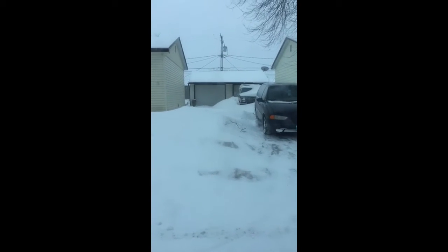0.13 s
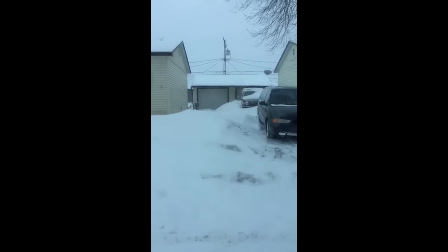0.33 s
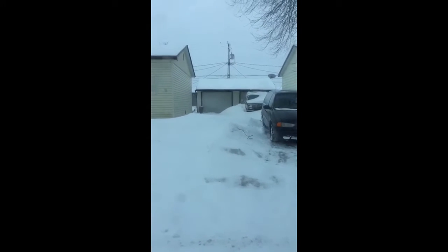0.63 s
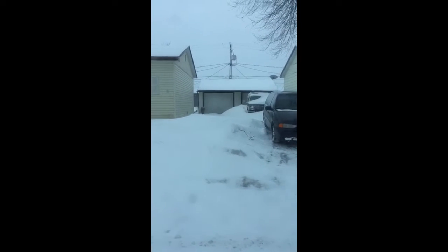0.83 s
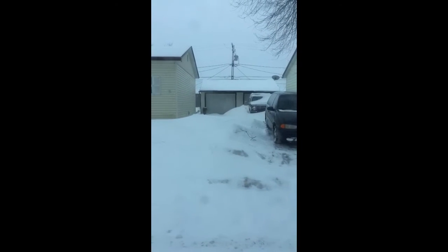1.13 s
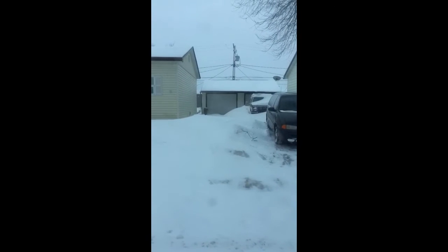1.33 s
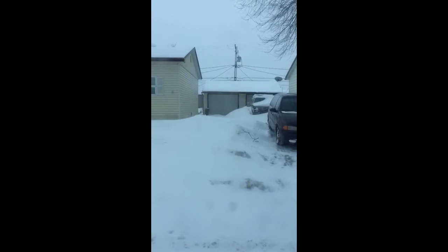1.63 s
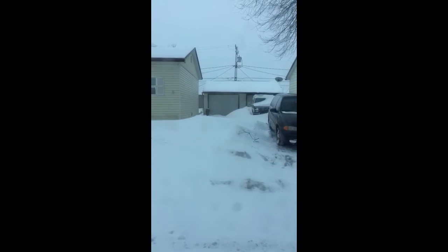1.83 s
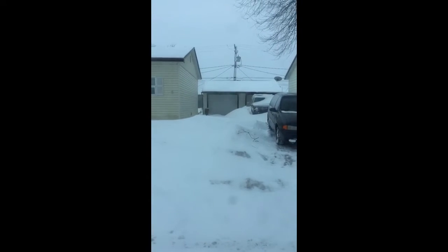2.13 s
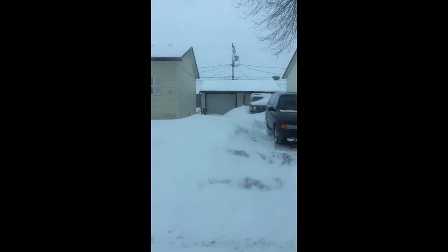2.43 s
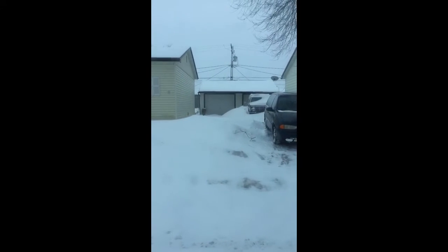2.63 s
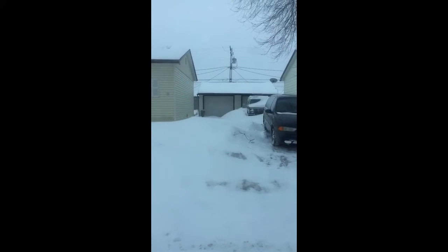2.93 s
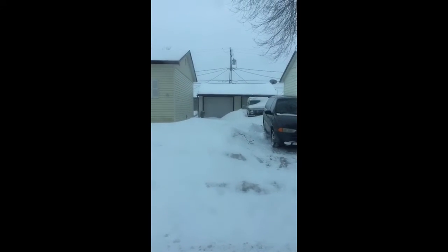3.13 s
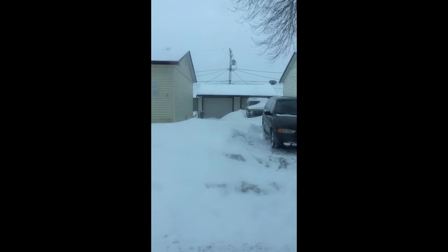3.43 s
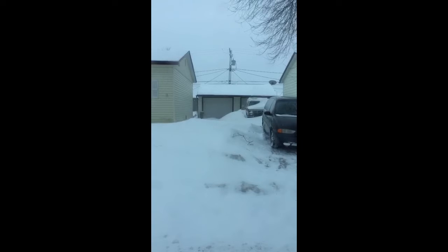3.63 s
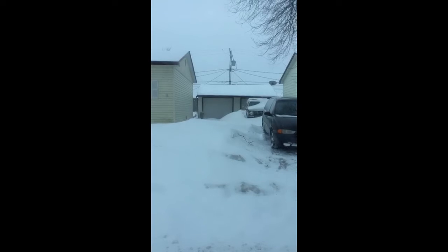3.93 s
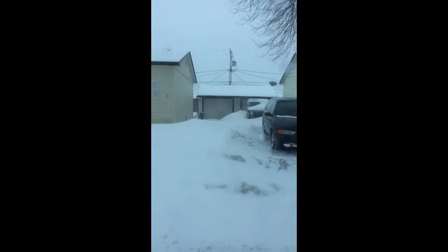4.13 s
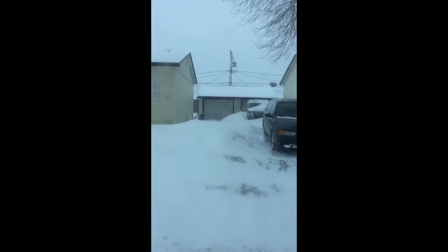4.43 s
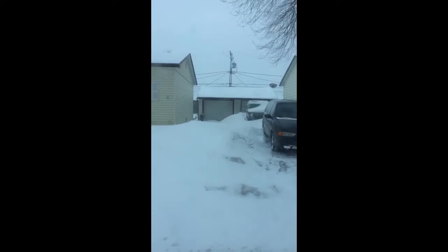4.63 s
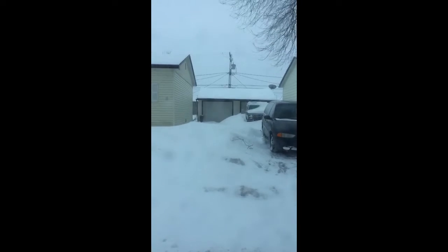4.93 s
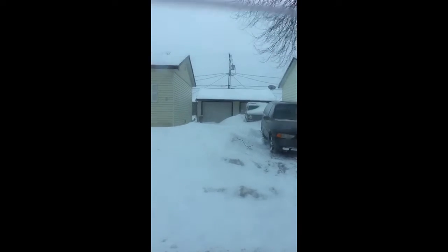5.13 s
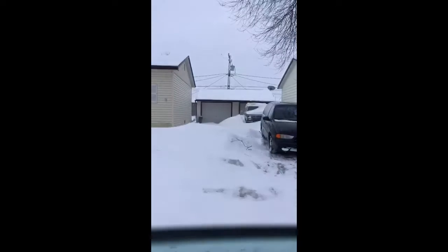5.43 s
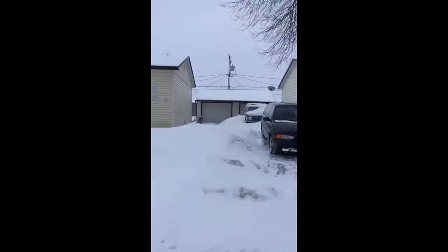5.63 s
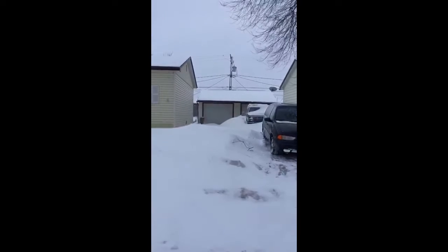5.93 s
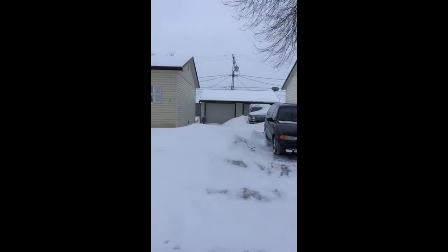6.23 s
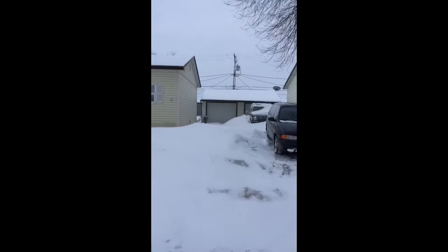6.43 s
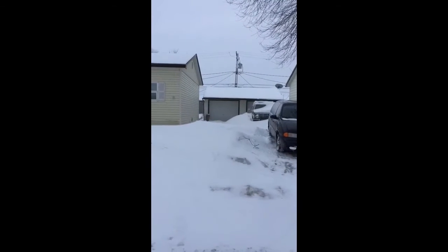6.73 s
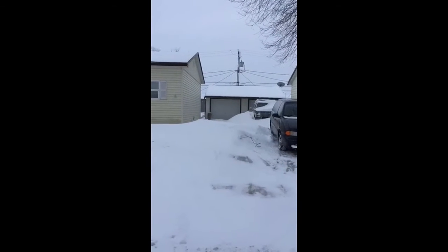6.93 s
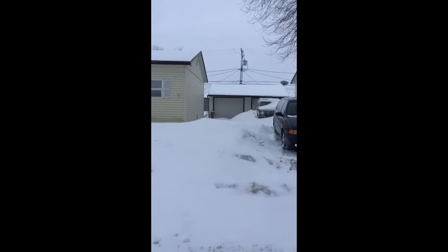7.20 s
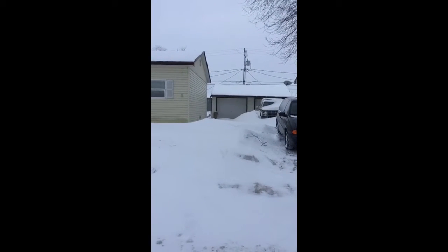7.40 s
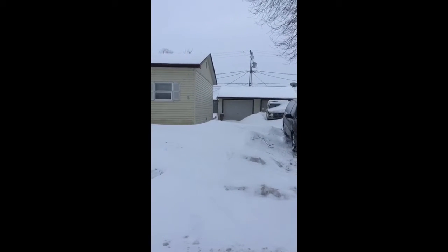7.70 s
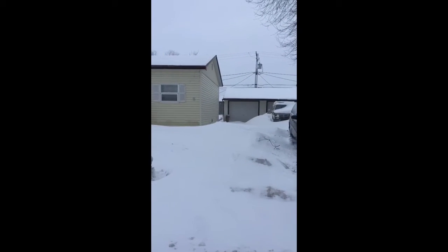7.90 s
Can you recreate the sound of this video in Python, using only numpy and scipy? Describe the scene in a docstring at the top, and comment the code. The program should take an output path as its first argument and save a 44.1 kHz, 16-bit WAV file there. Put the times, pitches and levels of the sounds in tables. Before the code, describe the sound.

A low idle and steady heater air fill a car cabin, heard close from inside. After two small plastic clicks, ice snaps sharply and the door thumps as a power window comes unstuck. Its motor whines and the frosty glass grinds downward, shedding crumbs of ice. When it stops, wind and fine blown snow are heard from outside, along with the ticking engine and light rustles of cloth.

```python
"""Inside a parked car in a snowstorm, on one microphone: the idling engine rumbles, the heater blows.
Close by, a sleeve brushes the door, the switch clicks, and the frozen side window breaks loose with a
bump. The glass scrapes down through its icy seal to the whine of its motor. From outside, the gap
lets in wind around the houses, blown snow and the ticking of the engine."""
import sys
import numpy as np
from scipy import signal
from scipy.fft import rfft, irfft, next_fast_len
from scipy.io import wavfile

SR = 44100
rng = np.random.default_rng(int(sys.argv[2]) if len(sys.argv) > 2 else 0)


def bounce(signal):
    """Save signal as a 16-bit WAV file at the path given by the first command-line argument."""
    frames = np.transpose(np.atleast_2d(signal))
    limited = np.clip(frames, -1, 1)
    pcm = np.round(limited * 32767).astype(np.int16)
    wavfile.write(sys.argv[1], SR, pcm)


N = 355534
TIME = np.arange(N) / SR
HZ = np.maximum(np.arange(N // 2 + 1) * SR / N, 1)
SLIDE_START_S, SLIDE_END_S = 4.05, 6.58
GAP_OPENS_S, GAP_WIDE_S = 5.4, 6.71


def from_db(db):
    """Decibels to gain."""
    return 10 ** (np.asarray(db) / 20)


def rms_one(x):
    """Scale to unit power."""
    return x / np.sqrt(np.mean(x ** 2) + 1e-20)


def ramp(start, end):
    """Rises from 0 to 1 between two times."""
    return np.clip((TIME - start) / (end - start), 0, 1)


def swell(middle, length):
    """A smooth rise from 0 to 1 and back."""
    return np.cos(np.pi * np.clip((TIME - middle) / length, -.5, .5)) ** 2


def after(s):
    """Seconds gone since a time."""
    return np.maximum(TIME - s, 0)


def sliding():
    """1 while the glass moves: a quick start and a softer stop."""
    return ramp(SLIDE_START_S, SLIDE_START_S + 0.065) * (1 - ramp(SLIDE_END_S - .16, SLIDE_END_S))


def add(track, s, sound):
    """Mix a short sound in at a time."""
    at = int(s * SR)
    track[at:at + len(sound)] += sound[:N - at]


def gain_at(spectrum, hz):
    """Gain of a spectrum, falling steeply below its first point."""
    points, db = np.transpose(spectrum)
    return from_db(np.interp(np.log(hz), np.log(points), db)) * np.minimum(hz / points[0], 1) ** 2


def coloured(x, spectrum):
    """A signal given a spectrum; rms 1."""
    return rms_one(irfft(rfft(x) * gain_at(spectrum, HZ), N))


def drift(rate_hz):
    """A slow random wander with spread 1."""
    step = 40
    size = next_fast_len(N // step + 2)
    hz = np.arange(size // 2 + 1) * SR / (step * size)
    slow = irfft(rfft(rng.standard_normal(size)) / (1 + (hz / rate_hz) ** 2), size)
    return np.interp(np.arange(N) / step, np.arange(size), rms_one(slow))


def noise(spectrum):
    """Smooth coloured noise; rms 1."""
    return coloured(rng.standard_normal(N), spectrum)


def grains(per_s, spread_db):
    """Tiny impacts of uneven size at random moments; rms 1."""
    sizes = from_db(spread_db * np.minimum(rng.exponential(1, N), 4)) * rng.choice([-1, 1], N)
    return rms_one(sizes * (rng.random(N) < per_s / SR))


def patchy(x, depth_db, rate_hz):
    """Each half octave from 256 Hz up swells and fades on its own; rms 1."""
    spectrum, out = rfft(x), 0
    for octave in np.arange(16, 29) / 2:
        band = np.maximum(1 - 2 * np.abs(np.log2(HZ) - octave), 0)
        out += irfft(spectrum * band, N) * from_db(depth_db * drift(rate_hz))
    return rms_one(out)


def resonant(x, modes):
    """Narrow resonances lift a signal around their centres; rms 1."""
    peaks = sum(from_db(db) * signal.lfilter(*signal.iirpeak(hz, hz / width, fs=SR), x)
                for hz, width, db in modes)
    return rms_one(x + peaks)


def ring(clicks, hz, t60):
    """A unit click sets a sine of height 1 ringing."""
    radius, angle = np.exp(-np.log(1000) / (t60 * SR)), 2 * np.pi * hz / SR
    return signal.lfilter([0, np.sin(angle)], [1, -2 * radius * np.cos(angle), radius ** 2], clicks + 1e-18)


def snap(colour, tilt_db, t60, size=8192):
    """A sharp burst dying in the small cabin, tilted by tilt_db an octave; peak near 1."""
    hz = np.maximum(np.arange(size // 2 + 1) * SR / size, 1)
    tilt = from_db(tilt_db * np.log2(np.maximum(hz, 300) / 2000))
    gain = rms_one(gain_at(colour, hz) * tilt)
    # minimum phase keeps the attack abrupt
    cepstrum = irfft(np.log(gain + 1e-4))
    cepstrum[1:size // 2] *= 2
    cepstrum[size // 2 + 1:] = 0
    burst = rng.choice([-1, 1], size) * np.exp(-np.log(1000) * np.arange(size) / SR / t60)
    return .5 * irfft(rfft(burst) * np.exp(rfft(cepstrum)))


def shifting_echoes(x, echo_db, wander, count=5):
    """Short paths off glass and trim lengthen and shrink, so ripples wander through the spectrum."""
    delays = [mean * (1 + wander * drift(0.556)) for mean in rng.uniform(0.003026, .014, count)]
    echoes = sum(np.interp(TIME - delay, TIME, x) for delay in delays)
    return (x + from_db(echo_db) * echoes) / np.sqrt(1 + count * from_db(echo_db) ** 2)


def engine_rumble(opened):
    """The idling engine booms all round the microphone; the boom shifts as the window opens."""
    # cabin boom, window shut and open: (frequency [Hz], level [dB])
    shut_colour = [(20, -34), (34, -24.5), (48, 3.5), (61, -6), (73, -3.5), (86, -6.5), (104, 0.5),
                   (165, -8), (225, -16), (300, -10), (385, -18), (440, -34.5), (700, -73)]
    open_colour = [(20, -43), (36, -11), (52, 1), (68, 3.5), (86, 3), (108, -1.5), (150, 0.5), (195, -8),
                   (250, -10.5), (320, -8.5), (385, -14), (440, -24.5), (700, -66)]
    shut_boom = from_db(-35.5) * np.sqrt(1 - opened) * noise(shut_colour)
    open_boom = from_db(-37) * np.sqrt(opened) * noise(open_colour)
    return (shut_boom + open_boom) * from_db(0.85 * drift(15))


def heater(opened):
    """Air blows through resonant ducts, and is heard less once the window opens."""
    # heater air: (frequency [Hz], level [dB])
    colour = [(380, -24), (470, -9.5), (560, -11), (670, -7), (850, -8), (930, -6.5), (1010, -9.5),
              (1130, -17), (1400, -20.5), (1700, -30), (2300, -32.5), (2600, -36), (4800, -42),
              (10500, -48)]
    # duct resonances: (frequency [Hz], width [Hz], level [dB])
    ducts = [(803, 14, 2), (911, 29, 5), (1100, 33, -9), (1430, 70, -9), (1780, 70, -2.5), (2130, 65, -0.5),
             (2246, 50, 2), (2800, 64, -4)]
    return from_db(-47.5 + 0.26 * drift(3.3) - 7.2 * opened) * resonant(noise(colour), ducts)


def storm():
    """Wind and dry blown snow come in gusts through the widening gap."""
    # far roar around the houses, near rush past the frame, snow hiss: (frequency [Hz], level [dB])
    roar_colour = [(300, -15), (620, 0.5), (760, -0.5), (900, 2), (1070, -1.5), (1350, -3.5), (1600, -4),
                   (2200, -17), (5000, -51)]
    rush_colour = [(1100, -15), (1600, -1.5), (1900, 4), (2400, 1.5), (3000, -7), (5000, -13), (10500, -44)]
    snow_colour = [(1500, -36), (3000, 2.5), (4300, 5.5), (5100, 3), (6600, 1), (7800, -2.5), (9600, -1),
                   (10500, -39)]
    # gusts: (middle [s], length [s], roar lift [dB], rush lift [dB], snow lift [dB])
    gusts = [(6.463, 0.078, 6, -4, 9.5), (6.62, 0.44, 0.5, 4, 1.5), (6.863, 0.32, -1.5, -3.5, 2.5),
             (7.02, 0.2, 2, -1, 4), (7.335, 0.36, -3, 1.5, 1), (7.553, 0.17, -1.5, -3, -1)]
    roar_db, rush_db, snow_db = sum(np.outer(lifts, swell(s, length)) for s, length, *lifts in gusts)
    wide_s = after(GAP_WIDE_S)  # a wide gap rushes and hisses less
    roar = from_db(-44.5 + roar_db) * patchy(noise(roar_colour), depth_db=2, rate_hz=31)
    rush = from_db(-47.5 + rush_db - 3 * wide_s + 2 * drift(43)) * noise(rush_colour)
    flakes = coloured(grains(per_s=5000, spread_db=0.5), snow_colour)
    snow = from_db(-54 + snow_db - 2.5 * wide_s) * patchy(flakes, depth_db=4, rate_hz=10)
    return ramp(GAP_OPENS_S, GAP_WIDE_S) * (roar + snow) + ramp(4.1, 5.7) * rush


def engine_outside():
    """Through the open window the engine hums and ticks once a firing, with a few sharper ticks."""
    # an engine tick: (frequency [Hz], level [dB])
    colour = [(1500, -10), (3500, -12.5), (5400, -10), (6500, 1.5), (7900, -10.5), (9250, -3), (10000, -20)]
    # the sharpest ticks: (time [s], level [dB])
    sharp_ticks = [(6.8245, -29.5), (6.9927, -36), (7.2386, -46), (7.3783, -37), (7.449, -30),
                   (7.4834, -39), (7.5893, -31.5), (7.8026, -31), (7.974, -36)]
    firing_hz, first_tick_s = 28.55, 6.503
    hum = np.sqrt(2) * np.sin(2 * np.pi * 5 * firing_hz * TIME)
    out = from_db(-52.5 + 8.1 * drift(4.4)) * ramp(SLIDE_START_S, GAP_OPENS_S) * hum
    firings = np.arange(first_tick_s, N / SR, 1 / firing_hz)
    soft_ticks = [(s, -41.5 + rng.uniform(-2.76, 3)) for s in firings]
    for s, db in soft_ticks + list(sharp_ticks):
        add(out, s, from_db(db) * snap(colour, tilt_db=-5.5, t60=0.026))
    return out


def sleeve():
    """Cloth brushes the door trim close by, each stroke with its own brightness."""
    # cloth on trim: (frequency [Hz], level [dB])
    colour = [(800, 0), (2000, 11), (2650, 7), (3200, 4), (3700, 2), (5000, -0.5), (6700, 1), (10500, -8.5)]
    # sleeve strokes: (middle [s], length [s], level [dB], rustle centre [Hz])
    strokes = [(2.57, 0.57, -66.5, 4500), (2.726, 0.29, -61.5, 4200), (6.383, 0.14, -47.5, 4000),
               (6.478, 0.084, -37, 1090), (6.871, 0.052, -45, 3700), (7.004, 0.24, -46.5, 1700),
               (7.434, 0.17, -52, 1900), (7.607, 0.2, -49.5, 4200)]
    width_octaves = 1.4
    fibres = rfft(grains(per_s=6000, spread_db=3)) * gain_at(colour, HZ)
    out = np.zeros(N)
    for s, length, db, hz in strokes:
        band = np.exp(-.5 * (np.log2(HZ / hz) / width_octaves) ** 2)
        out += from_db(db) * swell(s, length) * rms_one(irfft(fibres * band, N))
    return out * from_db(1.1 * drift(30))


def switch():
    """The plastic window switch clicks and rings briefly."""
    # plastic click: (frequency [Hz], level [dB])
    colour = [(600, -17), (1400, 2), (2200, -2), (3600, -6), (5000, -13), (7500, -15), (8800, -27),
              (10500, -23)]
    # switch clicks: (time [s], level [dB], tilt [dB/octave], ring [Hz])
    clicks = [(3.031, -38.5, -8.5, 1620), (3.562, -36, 0, 2200)]
    out = np.zeros(N)
    for s, db, tilt_db, hz in clicks:
        click = snap(colour, tilt_db, t60=0.076)
        body = ring(signal.unit_impulse(len(click)), hz, t60=0.03)
        add(out, s, from_db(db) * (click + from_db(-4) * body))
    return out


def grit():
    """Crumbs of ice drop to the sill in uneven flurries, dying away once the glass stops."""
    # falling grit: (frequency [Hz], level [dB])
    colour = [(900, -4.5), (1800, -5), (3200, 8), (4300, -4.5), (5200, 2), (7000, -10), (10500, -13)]
    level = from_db(-56 - 35 * after(6.6)) * (TIME > SLIDE_START_S)
    crumbs = grains(per_s=500 * from_db(8 * drift(6)), spread_db=3.5)
    return level * patchy(coloured(crumbs, colour), depth_db=1.5, rate_hz=26)


def window_motor():
    """Gears whine with sidebands a shaft rate apart; the door drones when the motor strains."""
    # gear whine: (time [s], pitch [Hz])
    pitch = [(4.2, 1625), (4.35, 1646), (4.62, 1613), (5.1, 1629), (5.45, 1619), (5.75, 1564), (6.4, 1534)]
    # partials of the whine: (shaft order [multiple], level [dB])
    partials = [(19, -21), (20, 0.5), (21, -13), (36, -26), (37, -23)]
    # door drones: (middle [s], length [s], shaft order [multiple], level [dB])
    drones = [(4.432, 0.36, 2, -36.5), (5.221, 0.98, 1, -38.5)]
    gear_order, full_s, runs_free_s = 20, 4.6, 5.47
    shaft_hz = np.interp(TIME, *np.transpose(pitch)) / gear_order
    wobble = 1 + 0.0027 * drift(25) + 0.00211 * drift(3.75)
    turn = 2 * np.pi * np.cumsum(shaft_hz * wobble) / SR
    whine = sum(from_db(db + 1.3 * drift(16)) * np.sin(order * turn) for order, db in partials)
    # the whine builds, holds, then fades as the glass runs free
    whine_db = -47 - 22 * np.maximum(full_s - TIME, 0) - 24 * after(runs_free_s)
    drone = sum(from_db(db) * swell(s, length) * np.sin(order * turn) for s, length, order, db in drones)
    return np.sqrt(2) * (from_db(whine_db) * whine + drone) * sliding()


def ice_cracks():
    """Each break snaps, pings the pane and jolts the door, whose low modes swing against each other."""
    # ice leaving the seal: (time [s], level [dB], tilt [dB/octave], push on the door [dB], t60 [s])
    cracks = [(4.005, -23.5, 7, -11.5, 0.069), (4.015, -22.5, -1, -40, .075),
              (4.0254, -13, 3.5, -17, 0.026), (4.031, -12.5, -0.5, -3, 0.058),
              (4.042, -12, 4.5, -38, 0.063), (4.054, -18, -1.5, -44, 0.048), (4.069, -20, 0.5, -32, .047),
              (4.076, -12, 6.5, -34, 0.029), (4.082, -11.5, 1, -10, .044), (4.101, -33, -7, -20, .03),
              (4.117, -22, 6, -13, 0.056), (5.483, -25.5, 1.5, -51, 0.026), (5.531, -25, 3.5, -52, 0.025),
              (5.778, -33, 9, -55, 0.028), (5.979, -27, 12, -58, .02), (6.249, -27.5, 5, -58, 0.019),
              (6.267, -27.5, 5, -58, 0.032), (6.366, -25.5, 10.5, -54, 0.04), (6.454, -28.5, 6, -53, 0.047),
              (6.476, -37, 2, -46, .047), (6.513, -32.5, 8, -22.5, 0.022), (6.537, -30, 5.5, -57, .06),
              (6.609, -30, 2, -57, .02), (6.848, -30, 9, -56, 0.042)]
    # snapping ice: (frequency [Hz], level [dB])
    colour = [(300, 1.5), (400, 7.5), (600, 5.5), (740, -3), (1050, 6), (1220, 2.5), (1600, 3), (2300, -1),
              (3300, -8.5), (4200, -12.5), (5500, -19), (7000, -24.5), (10500, -35)]
    # modes of the pane: (frequency [Hz], level [dB])
    pane_modes = [(1340, -3.5), (1600, 4), (2850, 3), (3400, -0.5), (4110, -5), (4400, -5.5)]
    # low modes of door panel and pane: (frequency [Hz], level [dB], t60 [s])
    door_modes = [(69.3, -10, 0.25), (87.7, -6.5, 0.12), (101.5, -14, 0.43), (130, -9, 0.24),
                  (149.7, -6.5, 0.11), (217, -9.5, 0.068), (344, -13.5, 0.037)]
    out, pushes = np.zeros(N), np.zeros(N)
    for s, crack_db, tilt_db, push_db, t60 in cracks:
        crack = snap(colour, tilt_db, t60)
        tap = signal.unit_impulse(len(crack))
        ping = sum((-1) ** k * from_db(db + rng.uniform(-21.6, 6)) * ring(tap, hz, t60=0.025)
                   for k, (hz, db) in enumerate(pane_modes))
        add(out, s, from_db(crack_db) * (crack + from_db(-14.5) * ping))
        add(pushes, s, from_db([push_db]))
    boom = sum((-1) ** k * from_db(db) * ring(pushes, hz, t60)
               for k, (hz, db, t60) in enumerate(door_modes))
    return out + signal.sosfilt(signal.butter(2, 42, "high", fs=SR, output="sos"), boom)


def glass_scrape():
    """Frosty glass drags on the door and grinds through the seal, duller and coarser as it sinks."""
    # scrape of the seal and low drag on the door: (frequency [Hz], level [dB])
    seal_colour = [(250, 1), (520, -5), (940, 2), (1230, -2), (1650, 1.5), (2500, -2), (2950, -2),
                   (3250, -4), (4200, -6), (4900, -10.5), (5950, -9), (7700, -12), (10500, -16.5)]
    drag_colour = [(70, 3), (110, -2), (170, -3), (320, -3), (420, -12.5), (750, -13), (1200, -26.5)]
    # door cavity modes, each strongest at one height of the glass:
    # (frequency [Hz], width [Hz], level [dB], strongest at [s])
    cavity_modes = [(936, 32, 2, 4.3), (1626, 45, 2, 5.2), (1800, 70, -7, 5.0), (2360, 52, -6, 4.3),
                    (2945, 150, -2.5, 4.1), (3530, 110, -12, 3.8), (3950, 100, -9, 5.1),
                    (4220, 130, -3, 5.8), (4500, 68, -3, 4.4), (5380, 140, -5, 5.45), (5900, 220, -2, 5.0),
                    (6850, 150, -4, 4.5)]
    fade_db_per_s = 12
    cavity = [(hz, width, db - fade_db_per_s * np.abs(TIME - s)) for hz, width, db, s in cavity_modes]
    sunk = ramp(4.9, 6.0)
    frost = grains(per_s=22000 * from_db(-13 * sunk), spread_db=1.5)
    scrape = patchy(resonant(coloured(frost, seal_colour), cavity), depth_db=1.5, rate_hz=12.5)
    dull = signal.sosfilt(signal.butter(1, 2600, fs=SR, output="sos"), scrape)
    scrape += 0.14 * sunk * (dull - scrape)
    drag = from_db(-36.5) * swell(middle=4.5, length=0.57) * noise(drag_colour)
    return from_db(-38.5) * scrape * sliding() + drag


def scene():
    """One microphone inside the car; sound from the window also reaches it off glass and trim."""
    at_window = glass_scrape() + grit() + storm() + engine_outside()
    window = shifting_echoes(at_window, echo_db=-17, wander=0.0415)
    opened = ramp(4.03, 4.53)
    cabin = engine_rumble(opened) + heater(opened)
    mono = cabin + sleeve() + switch() + ice_cracks() + window_motor() + window
    return np.stack([mono, mono])


def record(dry):
    """The recorder cuts the top steeply at 10.4 kHz."""
    return signal.sosfilt(signal.ellip(12, .2, 80, 10400, fs=SR, output="sos"), dry)


dry = scene()
out = record(dry)
bounce(out)
```